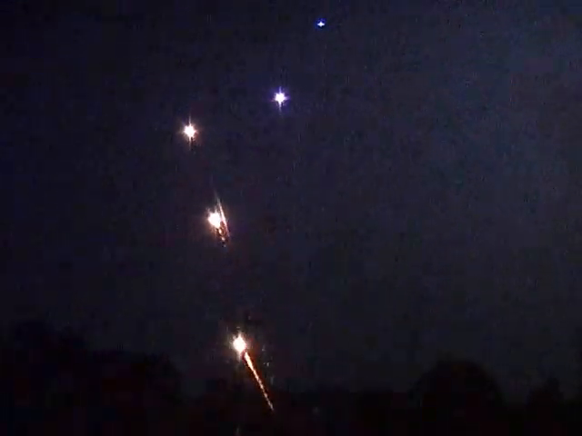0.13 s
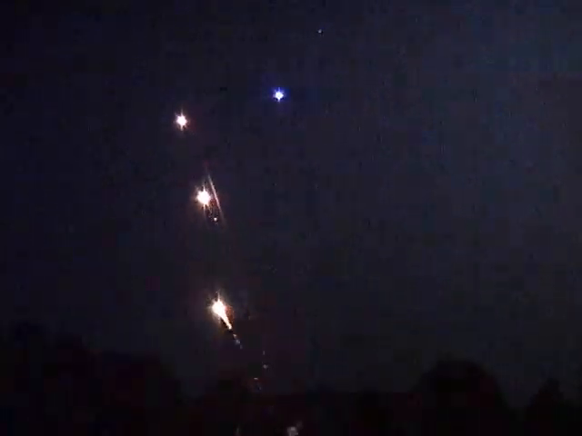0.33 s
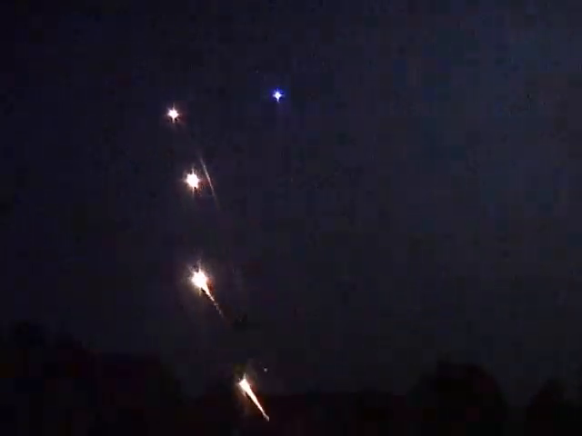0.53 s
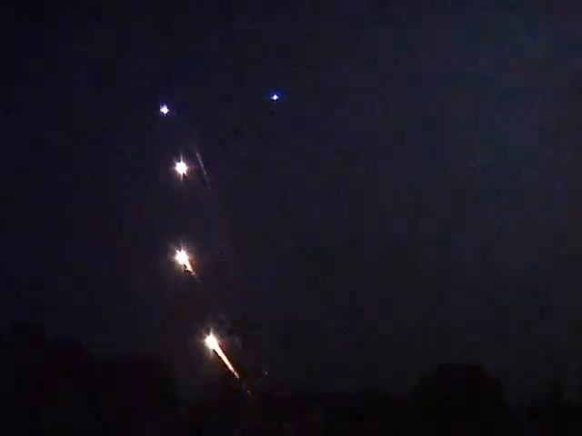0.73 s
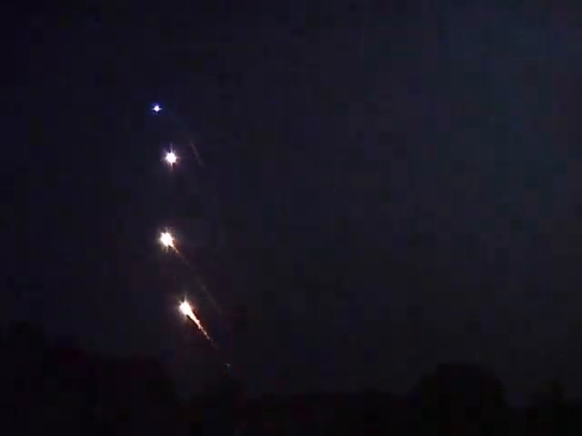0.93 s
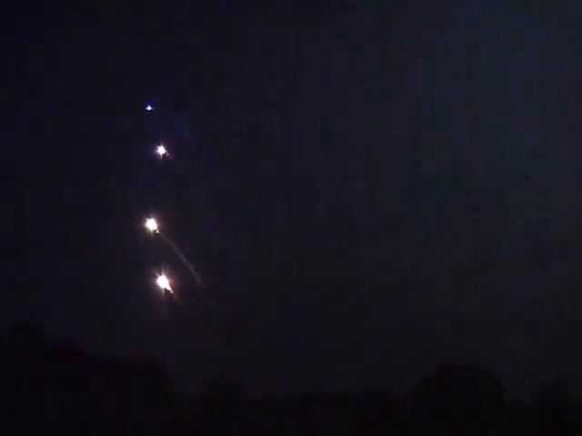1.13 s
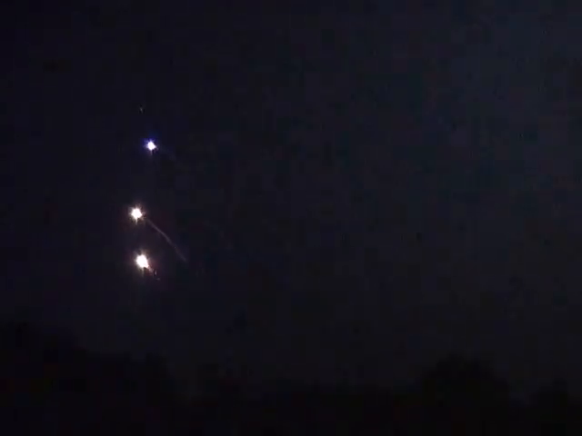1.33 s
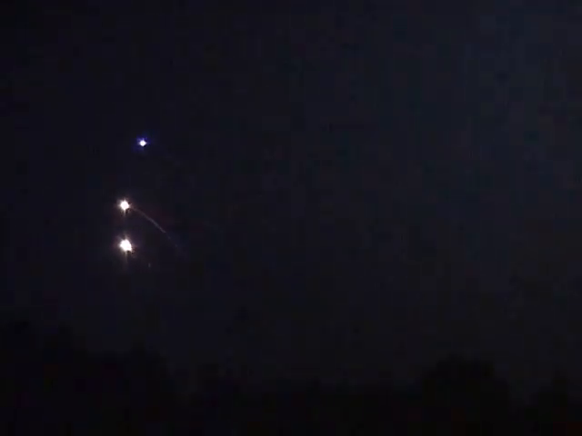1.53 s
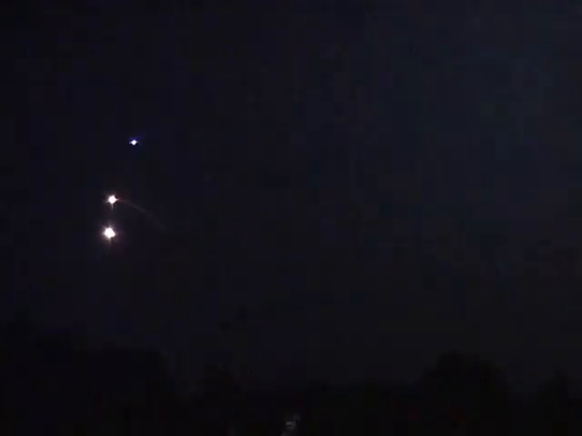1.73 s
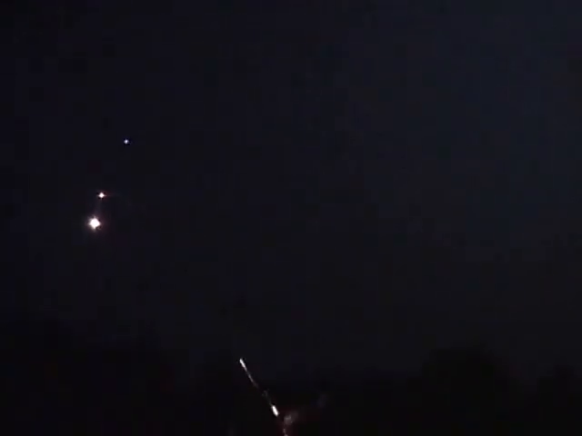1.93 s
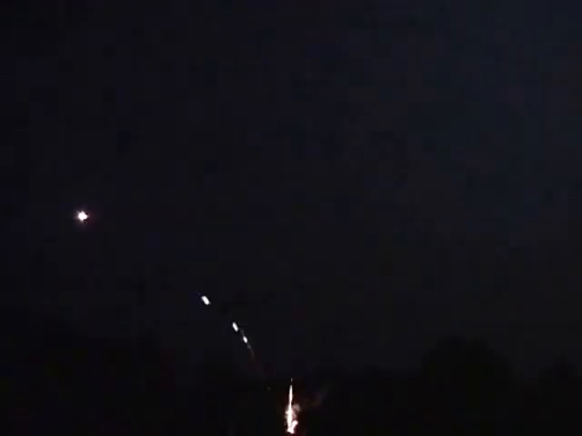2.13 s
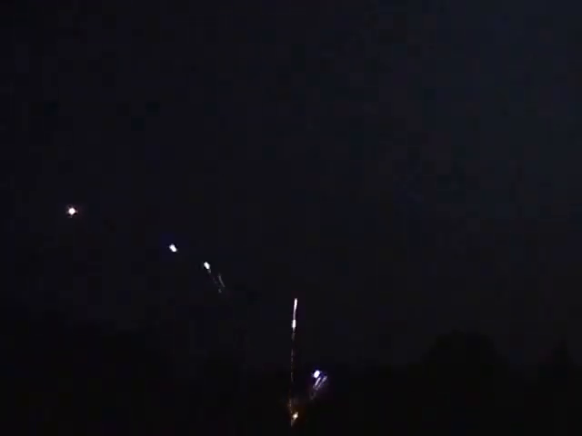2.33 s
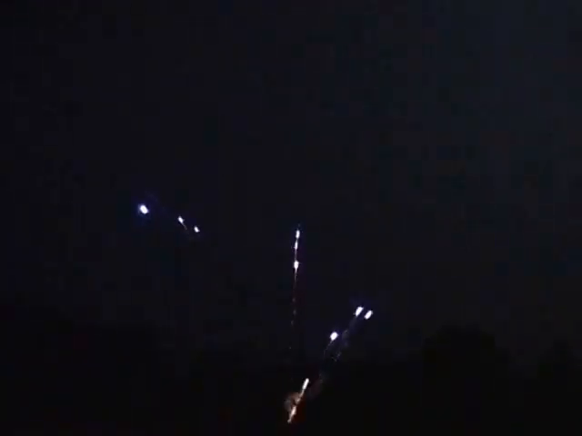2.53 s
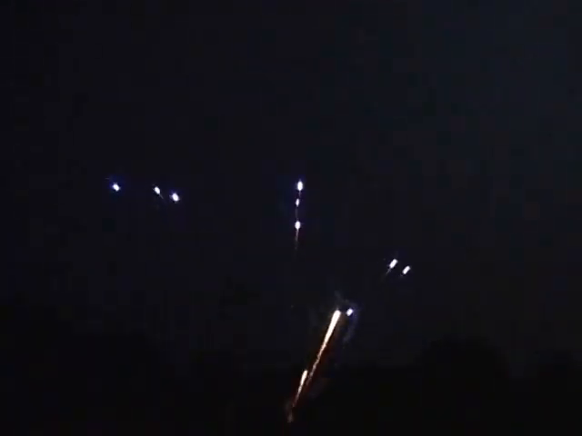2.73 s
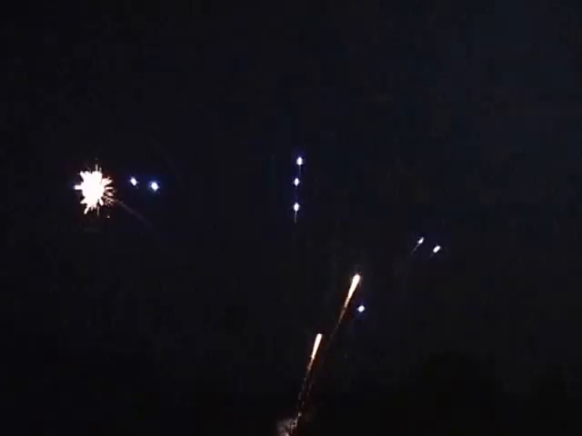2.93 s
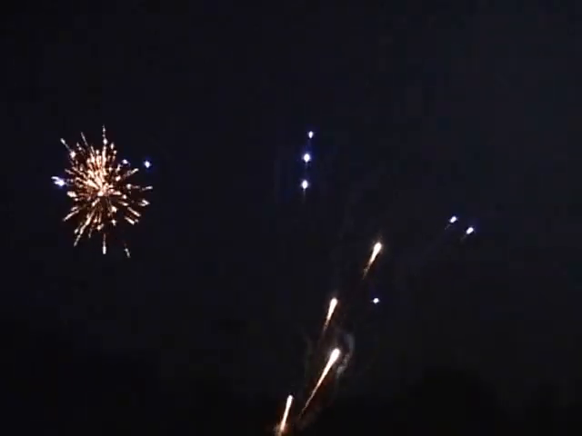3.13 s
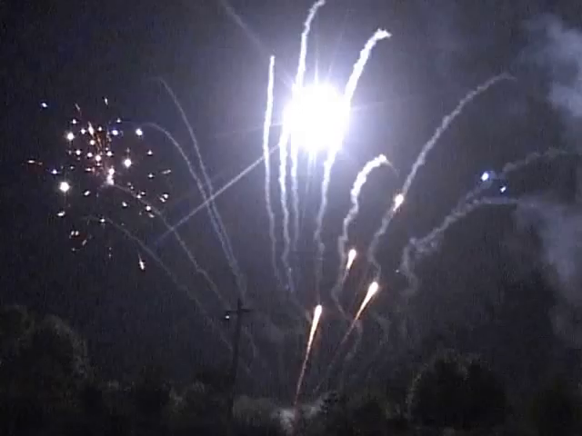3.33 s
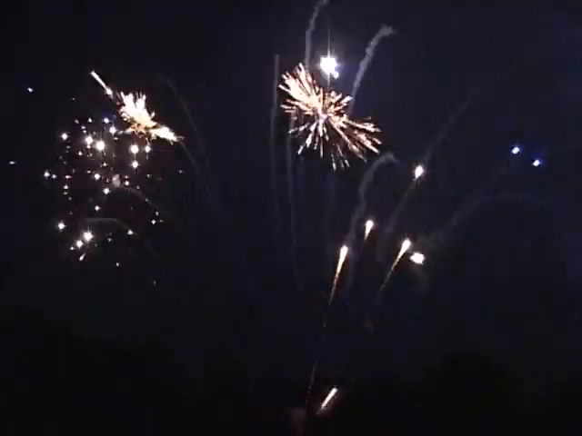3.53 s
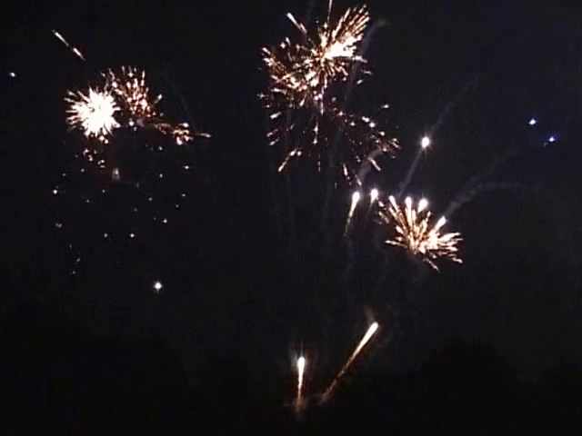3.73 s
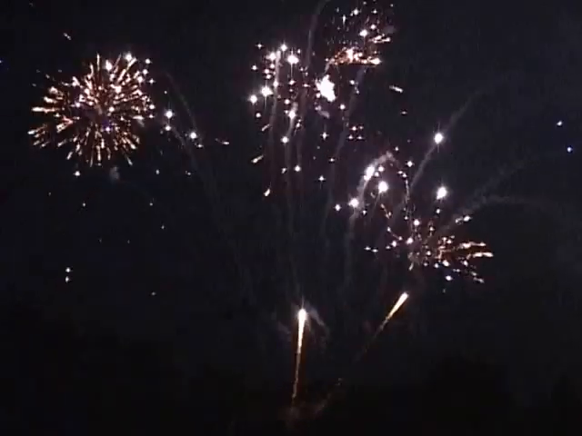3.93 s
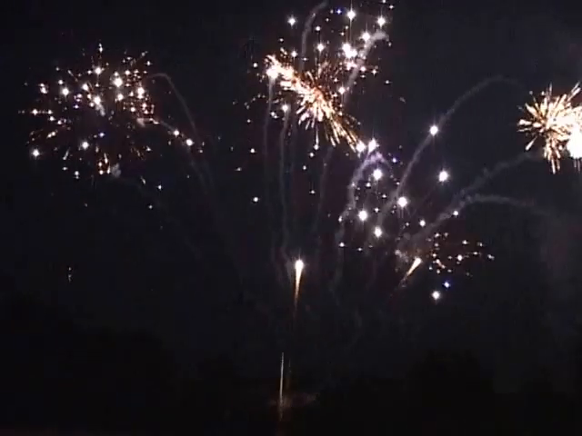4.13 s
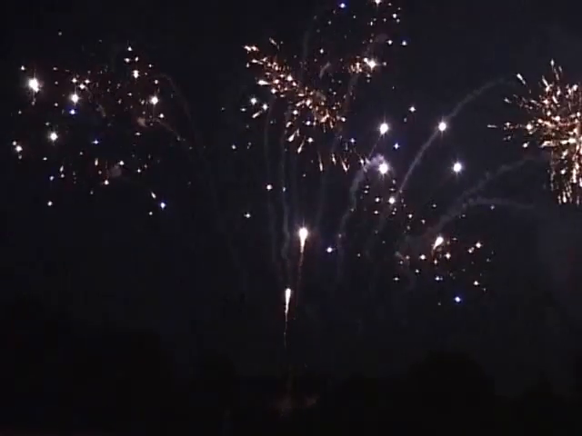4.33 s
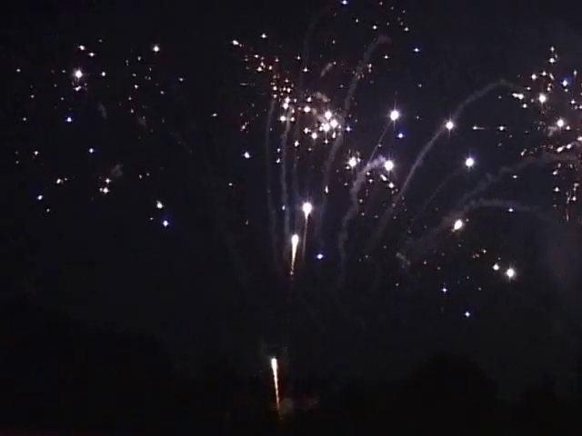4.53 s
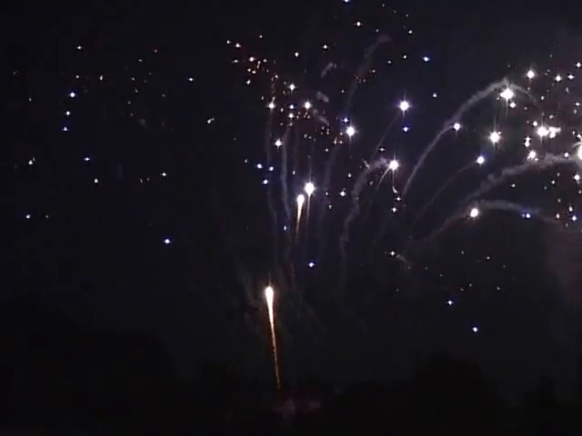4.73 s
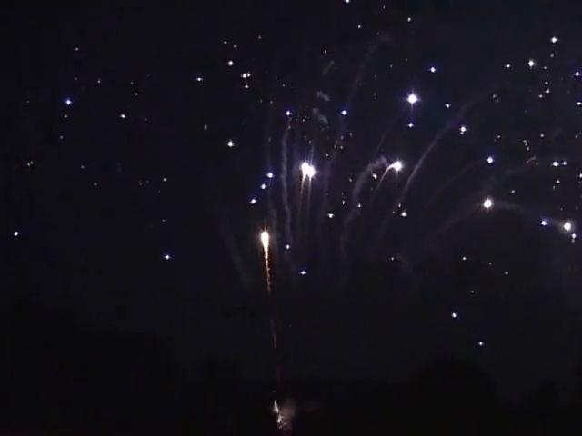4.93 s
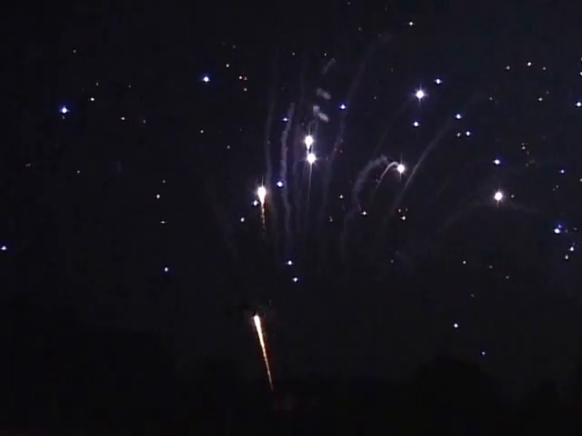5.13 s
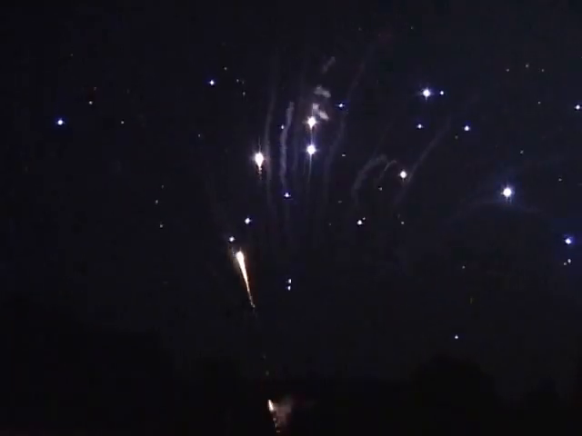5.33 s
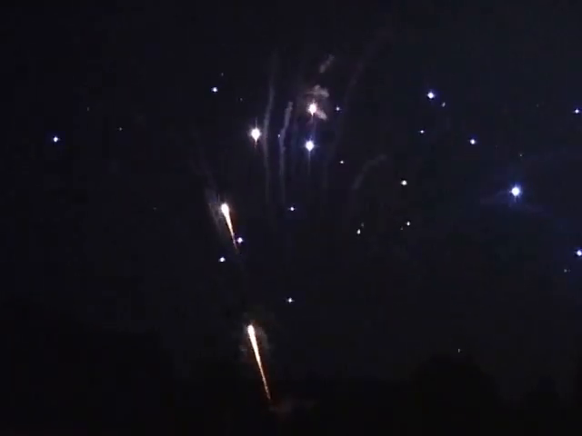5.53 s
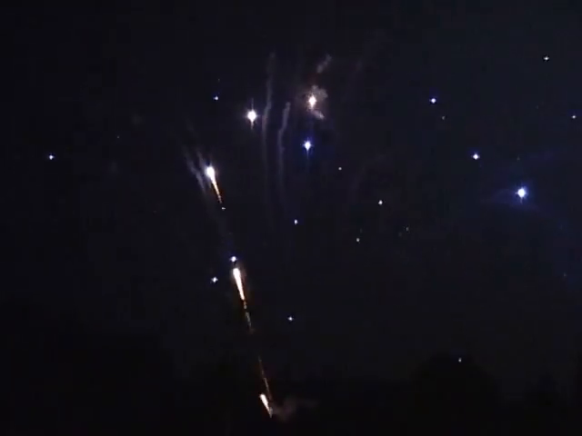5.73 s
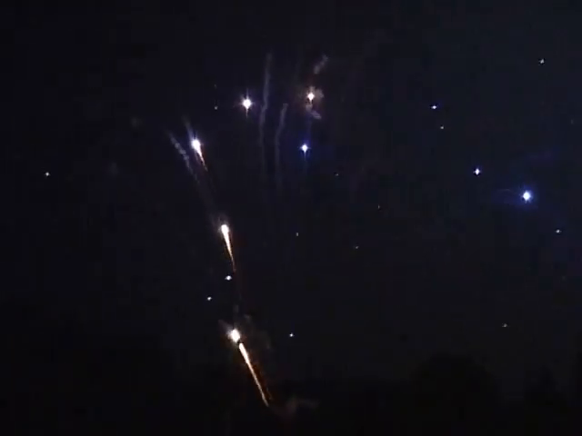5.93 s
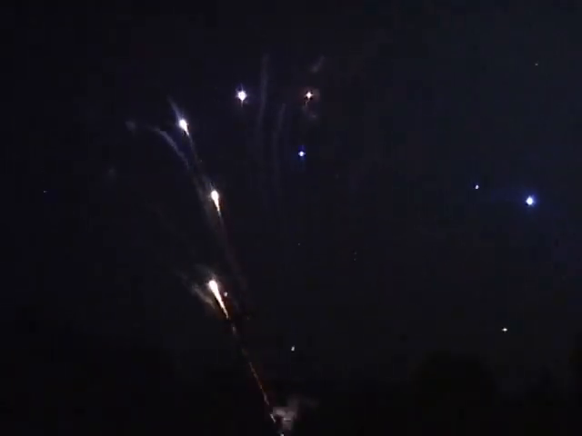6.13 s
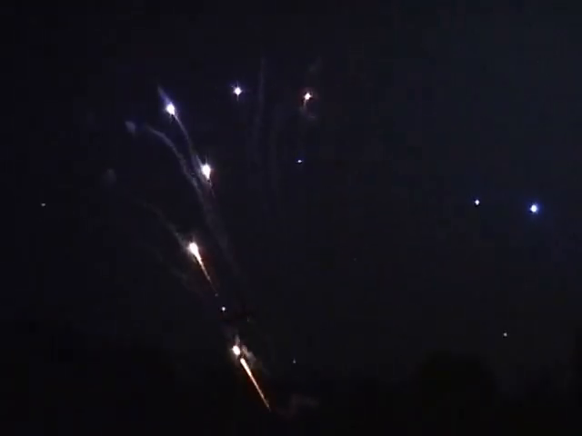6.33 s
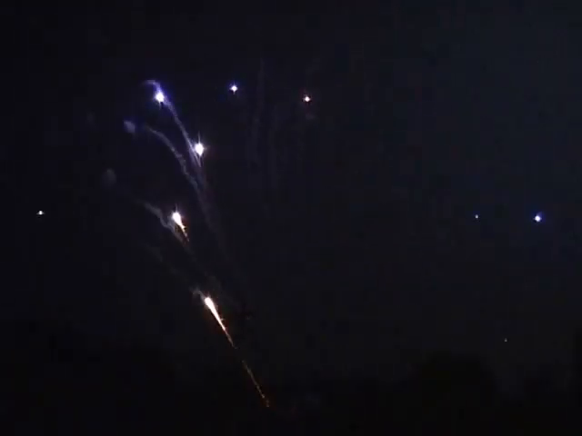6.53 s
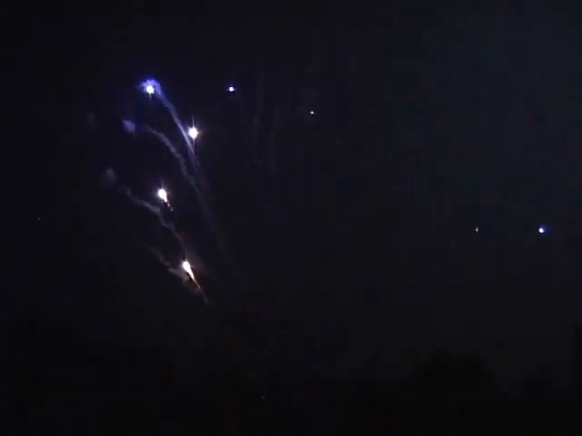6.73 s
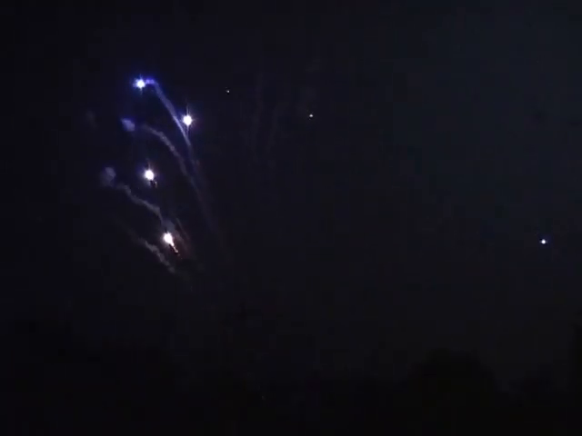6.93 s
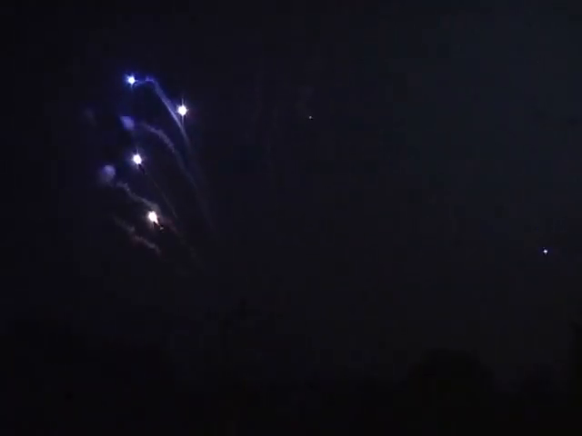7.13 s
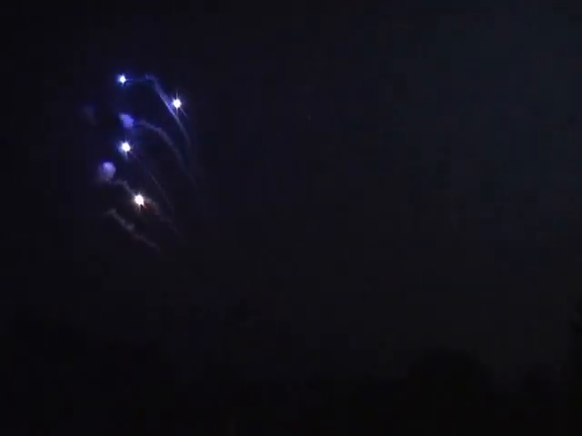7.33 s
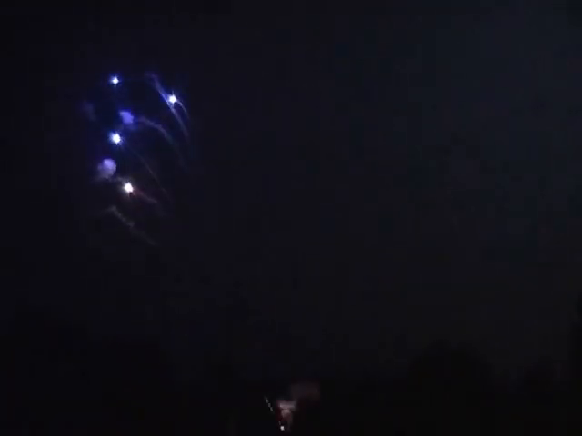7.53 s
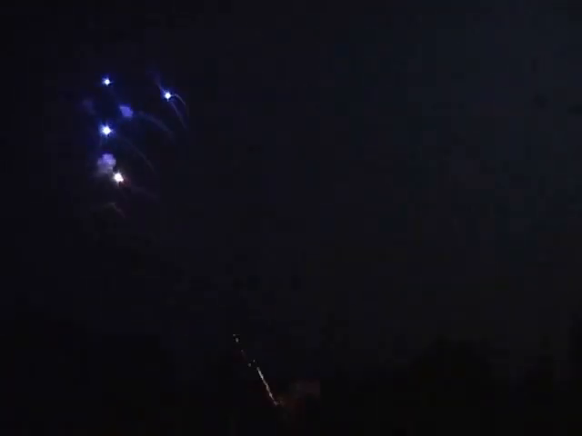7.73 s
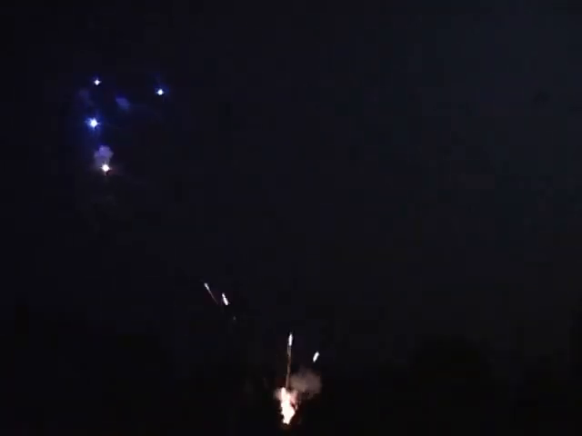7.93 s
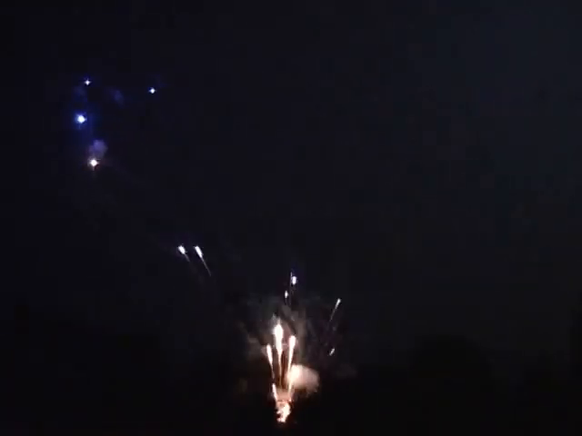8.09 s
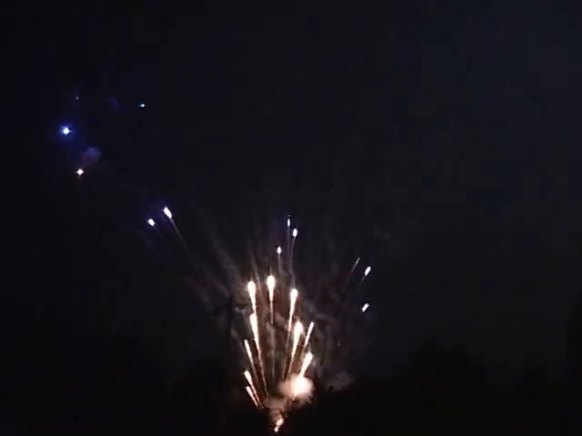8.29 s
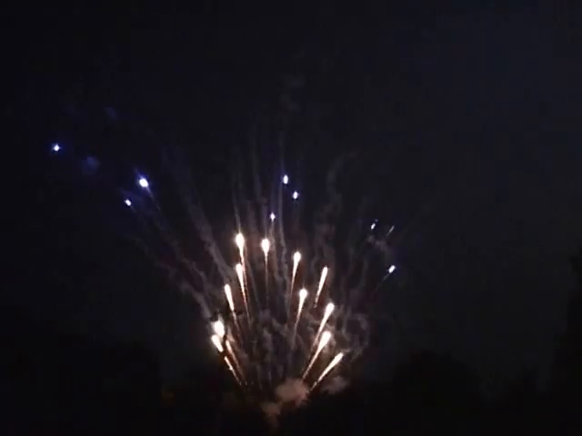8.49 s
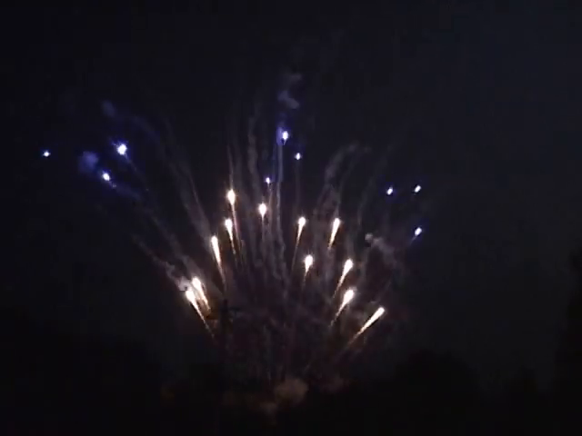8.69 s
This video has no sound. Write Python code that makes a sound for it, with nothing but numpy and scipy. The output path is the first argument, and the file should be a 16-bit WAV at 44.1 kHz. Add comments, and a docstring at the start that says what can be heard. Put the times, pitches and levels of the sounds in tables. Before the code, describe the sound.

A quiet night field carries faint drifting air. Firework launches crack at about 0.1 and 0.65 seconds, each a sharp snap over a short damped thump, followed by slapping wall echoes and diffuse rustling reverberation. After a pause, a fast irregular volley starts at 2.1 and continues to about 3.4. From 3.2 to 4.4, eight shells burst overhead with much heavier double-edged bangs, overlapping into rolling rumble that decays over the next seconds. Single launches punctuate it at roughly 4.7, 5.2, 5.6, 6.0 and 6.4. Then comes a lull, with the tail fading and barely audible distant tones near 7 seconds. At 7.8 another launch begins a dense barrage, rattling most tightly from 8.0 to 8.6, before echoes trail away. The left channel is low and hissy; the right is loud, clipped and momentarily choked by the blasts.

```python
"""Firework cake in a night field

Lift charges thump and crack in single shots and quick volleys, with shells bursting overhead midway.
Each blast is a thin shock front on a damped low thump; walls return knocks, grass and tree lines scatter.
Drifting night air and two faint tones lie underneath. One microphone feeds two inputs: a padded, hissy
left one and a hot right one that overloads on the bursts."""
import sys
import numpy as np
from scipy import signal
from scipy.fft import rfft, irfft
from scipy.io import wavfile
from scipy.ndimage import uniform_filter1d

SR = 44100
rng = np.random.default_rng(int(sys.argv[2]) if len(sys.argv) > 2 else 0)


def master(y):
    """Save y as 16-bit WAV."""
    cut = np.clip(np.atleast_2d(y).T, -1, 1)
    pcm = np.round(cut * 32767)  # scale
    wavfile.write(sys.argv[1], SR, pcm.astype(np.int16))


N = 386316

# Lift charges leaving the tubes; the tilt of the tube sets the share thrown at the far wall:
# start_s, level_db (of the thump), pitch_hz, wall_share_db
LIFT_SHOTS = [(.0958, -25, 700, -8), (.1057, -9.5, 630, 0.5), (.6404, -23, 700, -8), (.6504, -8, 654, -3.5),
              (2.0818, 0, 635, -4.5), (2.1977, -2, 566, 2.5), (2.215, 1, 604, -8.5), (2.3928, -1, 496, -12),
              (2.4024, 0.5, 525, -8.5), (2.4059, -1, 507, -11), (2.5696, 1, 544, -24),
              (2.5774, -0.5, 540, -23), (2.8001, -6.5, 520, -6.5), (2.9312, -9, 523, -11.5),
              (3.2143, -6.5, 507, -20), (3.3761, -4.5, 490, -5), (4.7393, -5.5, 595, -6.5),
              (5.2272, -10, 560, 4), (5.6246, -6, 603, -1.5), (5.8915, -25, 600, -11), (5.993, -6, 610, -1),
              (6.2835, -24.5, 593, -16), (6.4372, -7.5, 603, 3), (7.8289, -2, 597, 0.5),
              (7.9575, 0, 556, 0), (7.961, -1.5, 503, -3), (8.0943, 0, 484, -25), (8.1058, -0.5, 450, -16),
              (8.1083, -3.5, 427, -11), (8.1171, -0.5, 483, -16), (8.1258, -2.5, 473, -17),
              (8.2095, 2.5, 540, -14), (8.2391, 0, 580, -10), (8.2902, -7, 454, -4), (8.3789, -7.5, 493, 2),
              (8.4024, -5, 495, -5), (8.4339, -6.5, 504, -0.5), (8.4866, -6, 594, 0),
              (8.5302, -9.5, 634, 0), (8.5995, -7, 480, -9)]
# Crack over thump, extra crack per dB of wall share (tilted tubes crack sharper), dullest crack over thump
CRACK_DB, CRACK_DB_PER_WALL_DB, DULLEST_CRACK_DB = 2.5, .45, -2
# An inverted copy of the crack follows close behind each front
FLIP_MS, FLIP_DB = .74, -2
# Two large near surfaces return the low thump whole: delay_ms, and level_db for each
BODY_DELAYS_MS = [8.3, 21.8]
BODY_LEVELS_DB = [-8, -17.5]
# Surfaces around the cake: delay_ms, then level_db, pitch_hz (returned best) for each
ECHO_DELAYS_MS = [6.8, 8.6, 12.45, 14.7, 23.4, 62.3, 63.6, 118.9, 125.25, 199.4, 221.4]
ECHO_SURFACES = [(-16, 1000), (-7, 1160), (-8, 1210), (-10, 900), (-15.5, 530), (-19, 1000), (-13.5, 1100),
                 (-25, 1030), (-20, 1870), (-24.5, 800), (-24, 600)]
# The far wall: delay_ms, then level_db, pitch_hz for each return
WALL_DELAYS_MS = [51.9, 53.2]
WALL_RETURNS = [(-12, 840), (-2.5, 1690)]

# Shells bursting: start_s, ground_echo_ms, wall_echo_ms, wall_echo_db, rumble_db (trim on the field's scatter)
SHELL_BURSTS = [(3.2274, 2.1, 10.5, -7, 0), (3.6892, 2.9, 14.1, -2, 0), (3.7213, 2.6, 11, -5, -1),
                (3.8656, 4.2, 7.5, -2, 3.5), (4.0152, 2.7, 10.5, -6, 0), (4.25, 3.1, 14.1, -2, .5),
                (4.3367, 3, 7, -11, 0), (4.4081, 2.9, 6.5, -10, -.5)]
BURST_DB, BURST_HZ, BURST_CRACK_DB, GROUND_DB = 22.5, 700, -2.5, -1.3

# Scatter from grass and hedges: first_s (below zero: no silent gap), peak_s, peak_db,
# loss_db_per_doubling (of delay, either side of the peak), loss_db_per_s, length_s
LIFT_SCATTER_SHAPE = (-0.05, .007, -32.5, 4.9, 14.5, 1.66)
BURST_SCATTER_SHAPE = (-0.0053, 0.0113, -36, 6.5, 4.5, 3.0)
# Scatter colour: pitch_hz, start_db, loss_db_per_s (of delay, to air and leaves)
LIFT_SCATTER_COLOUR = [(199.3, 4.5, 14), (545, -6.5, -10.5), (915, 7.5, 0.5), (1394, 11, 1.5),
                       (2200, 9.5, -6.5), (3220, 7, 8), (4330, 6, 0), (8100, 3.5, 24), (14000, 18, 25.5)]
BURST_SCATTER_COLOUR = [(198, -11, 0.92), (470, 3, 3), (926, 2, 3.5), (1450, 7, 2), (2500, 9, 2),
                        (4100, 8, 2.5), (8000, 5, 3.3), (14180, 22, 8)]
# Tree lines that lift the scatter for a moment: delay_s, lift_db, depth_s
LIFT_TREE_LINES = [(.06, 5, 0.014), (.125, 6, .04), (.225, 8, .028)]
BURST_TREE_LINES = [(.08, 3.5, .055), (.223, 4, .006), (.26, 6, .05)]

# Distant air and capsule hiss, relative spectrum: pitch_hz, level_db (per Hz)
NIGHT_COLOUR = [(20, -30.5), (170, -13), (220, -3.5), (400, -1), (1050, -5), (1400, -10), (3300, -12),
                (4500, -7), (5300, -14.5), (6200, -8), (7000, -21), (8000, -15.5), (9000, -26),
                (10000, -17.5), (11500, -20), (12800, -50.5)]
NIGHT_DB, DRIFT_DB, DRIFT_S = -52.5, 1.5, .15  # rms before drift, rms drift, smoothing window
# Faint far-off tones: start_s, length_s, pitch_hz, peak_db
FAR_TONES = [(6.65, .45, 790, -62), (7.05, .35, 340, -60)]

# Capsule response behind a steep low cut: pitch_hz, level_db
MIC_COLOUR = [(30, -17.5), (130, -14.5), (180, -3.5), (230, 5), (400, 2), (800, -3), (1100, 0.5), (1500, 1),
              (3000, 1.5), (3700, 1), (4500, 6), (5300, 3.5), (6200, 6.5), (7200, 1.5), (8000, 1),
              (9000, -5), (11500, -1.5), (14000, -14)]
# Hiss of the padded input, relative spectrum: pitch_hz, level_db
PAD_HISS_COLOUR = [(20, 3), (60, 4.5), (200, -25.5), (6000, -8.5), (8000, -8.5), (8600, -15.5),
                   (15000, -33)]
CAPSULE_DB, PAD_DB, PAD_HISS_DB = 23, -22.5, -88.5  # saturation level, pad gain, hiss rms
RAIL, BIAS_MS, BIAS_SHIFT = 1.3, 11, 4.5  # clip level, bias time constant, shift per unit of overload
COUPLING_HZ, EDGE_HZ = 2.1, 14600  # low cut of each coupling capacitor, top edge of both inputs


def lifts():
    """All tubes stand in one box and share the echoes of the place; neighbours differ in fine scatter."""
    upward = np.zeros((3, N))
    near, sideways, wallward = np.zeros((3, N))
    for k, (s, db, hz, wall_db) in enumerate(LIFT_SHOTS):
        crack_db = max(CRACK_DB + CRACK_DB_PER_WALL_DB * wall_db, DULLEST_CRACK_DB)
        add(upward[k % len(upward)], s, blast(db, hz, crack_db))
        add(near, s, spit(db + crack_db))
        add(near, s + FLIP_MS / 1000, -gain_of(db + crack_db + FLIP_DB) * front())
        add(sideways, s, gain_of([db + crack_db]))  # sharper shots throw stronger echoes
        for ms, body_db in zip(BODY_DELAYS_MS, BODY_LEVELS_DB):
            add(near, s + ms / 1000, gain_of(db + body_db) * thump(hz))
        add(wallward, s, gain_of([db + wall_db]))
    spread = np.zeros(N)
    for shots in upward:
        field = scatter(LIFT_SCATTER_SHAPE, LIFT_TREE_LINES, LIFT_SCATTER_COLOUR, lumps_db=3.0)
        spread += signal.fftconvolve(shots, field)[:N]
    echoes = bounce(sideways, ECHO_DELAYS_MS, ECHO_SURFACES)
    wall = bounce(wallward, WALL_DELAYS_MS, WALL_RETURNS)
    return upward.sum(0) + near + echoes + wall + spread


def bursts():
    """Each shell bursts at its own spot in the sky, with its own ground echo, wall echo and rumble."""
    out = np.zeros(N)
    shock = blast(BURST_DB, BURST_HZ, BURST_CRACK_DB)
    for s, ground_ms, wall_ms, wall_db, rumble_db in SHELL_BURSTS:
        add(out, s, shock)
        add(out, s + ground_ms / 1000, gain_of(GROUND_DB) * shock)
        add(out, s + wall_ms / 1000, gain_of(wall_db) * shock)
        field = scatter(BURST_SCATTER_SHAPE, BURST_TREE_LINES, BURST_SCATTER_COLOUR, lumps_db=2.3)
        add(out, s, signal.fftconvolve(gain_of(rumble_db) * shock, field))
    return out


def blast(db, hz, crack_db):
    """The shock front rides on the thump."""
    return gain_of(db) * (gain_of(crack_db) * front() + thump(hz))


def front():
    """A thin shock front: sharp pressure rise, then suction."""
    t = np.arange(400) / SR
    u = t / 0.00029
    rise = 1 - np.exp(-t / .00004)
    return rise * (1 - u) * np.exp(-u)


def thump(hz):
    """The gas overshoots and swings back about once."""
    cycles = hz * np.arange(400) / SR
    swing = -np.sin(2 * np.pi * (cycles - .1))
    return swing * np.exp(-((cycles - .55) / 0.59) ** 2)


def spit(db):
    """Burning grains crackle for a moment at the muzzle: a decaying puff of bright noise."""
    crackle = np.diff(rng.standard_normal(401))
    return gain_of(db - 21.5) * crackle * np.exp(-np.arange(400) / SR / 0.0023)


def bounce(clicks, delays_ms, surfaces):
    """Each surface returns a late knock at its own pitch."""
    knocks = np.zeros(SR)
    for ms, (db, hz) in zip(delays_ms, surfaces):
        add(knocks, ms / 1000, gain_of(db) * thump(hz))
    return signal.fftconvolve(clicks, knocks)[:N]


def scatter(shape, trees, colour, lumps_db):
    """A random impulse response that thins with delay, swells at tree lines and loses top treble fastest."""
    first, peak, db, per_doubling, per_s, length = shape
    t = np.arange(round(length * SR)) / SR
    raw = rng.standard_normal(4 * SR)[:len(t)]
    hz, frames, z = signal.stft(raw, SR, nperseg=256, noverlap=192)
    start_db = read(colour, hz)[:, None]
    loss_db = read(colour, hz, axis=2)[:, None] * frames
    z = z * gain_of(start_db - loss_db)
    # separate trees and sheds make the return uneven over pitch and time
    lumps = uniform_filter1d(rng.standard_normal(z.shape), size=9, axis=0)
    lumps = uniform_filter1d(lumps, size=5, axis=1)
    z = z * gain_of(lumps_db * lumps / lumps.std())
    grains = signal.istft(z, SR, nperseg=256, noverlap=192)[1][:len(t)]
    swells = sum(lift_db * np.exp(-((t - s) / depth) ** 2) for s, lift_db, depth in trees)
    doublings = abs(np.log2(np.maximum(t, first) / peak))
    level = db - per_doubling * doublings - per_s * t + swells
    return grains * gain_of(level) * (t > first)


def night():
    """Distant air drifts in level; faint tones surface in it and fade again."""
    window = round(DRIFT_S * SR)
    drift = uniform_filter1d(uniform_filter1d(rng.standard_normal(N), window), window)
    out = noise(NIGHT_COLOUR, NIGHT_DB) * gain_of(DRIFT_DB * drift / drift.std())
    for s, length, hz, db in FAR_TONES:
        t = np.arange(0, length, 1 / SR)
        swell = np.sin(np.pi * t / length)
        add(out, s, gain_of(db) * swell * np.sin(2 * np.pi * hz * t))
    return out


def noise(colour, db):
    """Steady coloured noise of the given rms level."""
    shape = gain_of(read(colour, np.fft.rfftfreq(N, 1 / SR)))
    x = irfft(rfft(rng.standard_normal(N)) * shape, N)
    return gain_of(db) * x / x.std()


def gain_of(db):
    """dB to gain."""
    return 10 ** (np.asarray(db) / 20)


def read(points, hz, axis=1):
    """One column of a spectrum table on a log-frequency axis."""
    table = np.transpose(points)
    return np.interp(np.log(hz + 1), np.log(table[0] + 1), table[axis])


def add(mix, s, sound):
    """Mixes a sound in at s seconds."""
    part = mix[round(s * SR):][:len(sound)]
    part += sound[:len(part)]


def scene():
    """One point in the field, heard by one capsule."""
    return np.tile(lifts() + bursts(), (2, 1))


def microphone(x):
    """The capsule saturates softly; its causal colour and low cut ring after each front."""
    log_gain = np.log(gain_of(read(MIC_COLOUR, abs(np.fft.fftfreq(8192, 1 / SR)))))
    minimum_phase = np.exp(np.conj(signal.hilbert(log_gain)))
    taps = np.fft.ifft(minimum_phase).real[:4096]
    limit = gain_of(CAPSULE_DB)
    return signal.oaconvolve(limit * np.tanh(x / limit), taps)[:N]


def record(dry):
    """Overload drags the bias of the hot input down; its coupling capacitors then swing slowly back."""
    mic = microphone(dry[0]) + night()
    left = gain_of(PAD_DB) * mic + noise(PAD_HISS_COLOUR, PAD_HISS_DB)
    overload = np.clip(abs(mic) - RAIL, 0, 1)
    keep = np.exp(-1000 / (BIAS_MS * SR))
    bias = BIAS_SHIFT * signal.lfilter([1 - keep], [1, -keep], overload)
    right = np.clip(mic - bias, -RAIL, RAIL)
    coupling = signal.butter(1, COUPLING_HZ, "high", fs=SR)
    for _ in range(2):  # two capacitors in a row
        right = signal.lfilter(*coupling, right)
    both = np.clip([left, right], -1, 1)
    top_cut = signal.firwin(127, EDGE_HZ, window=("kaiser", 9), fs=SR)
    return signal.oaconvolve(both, top_cut[None], "same")


dry = scene()
out = record(dry)
master(out)
```